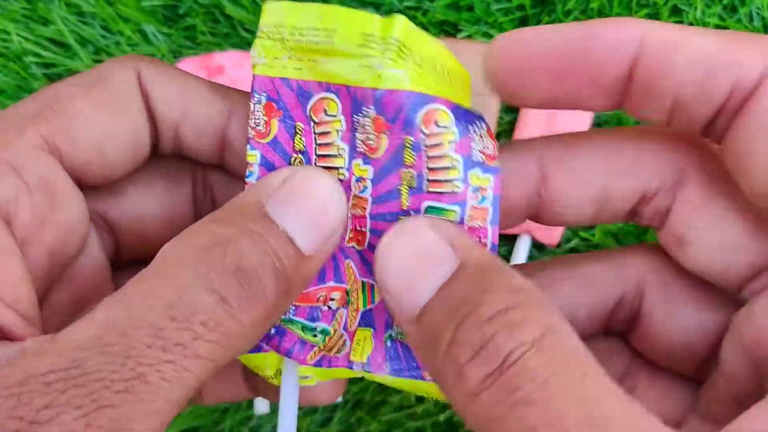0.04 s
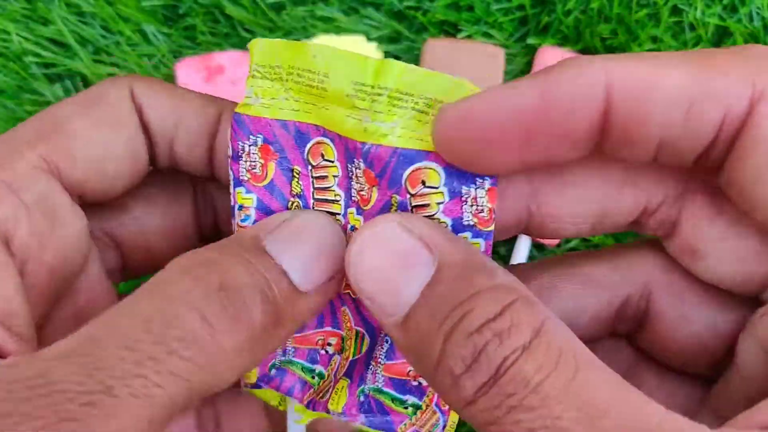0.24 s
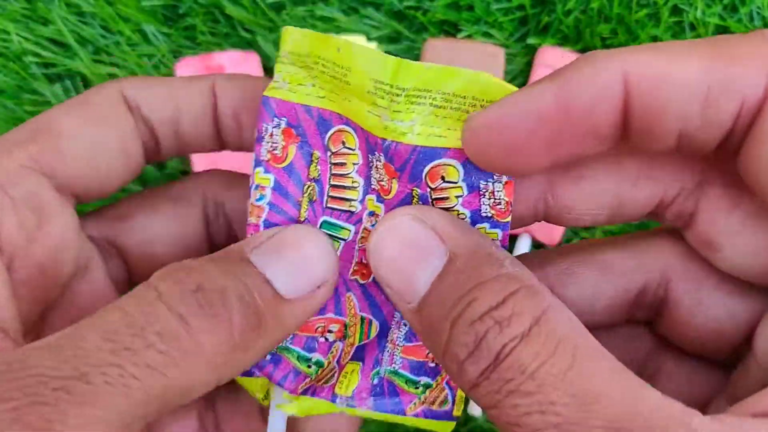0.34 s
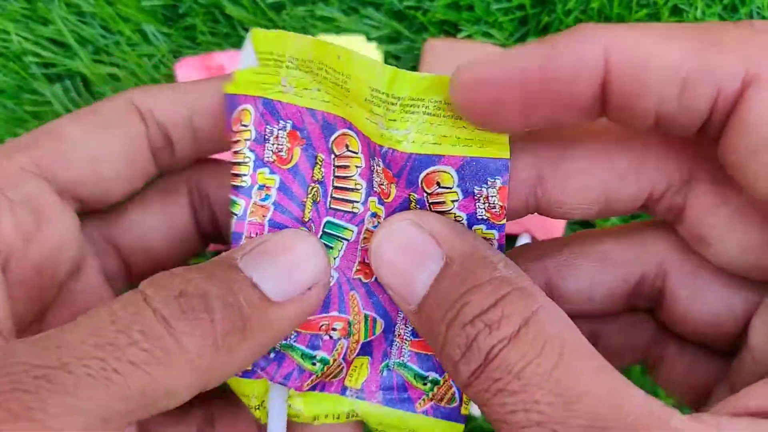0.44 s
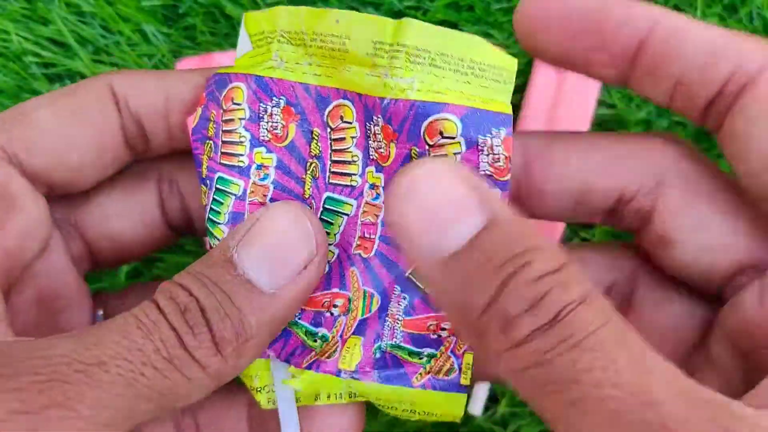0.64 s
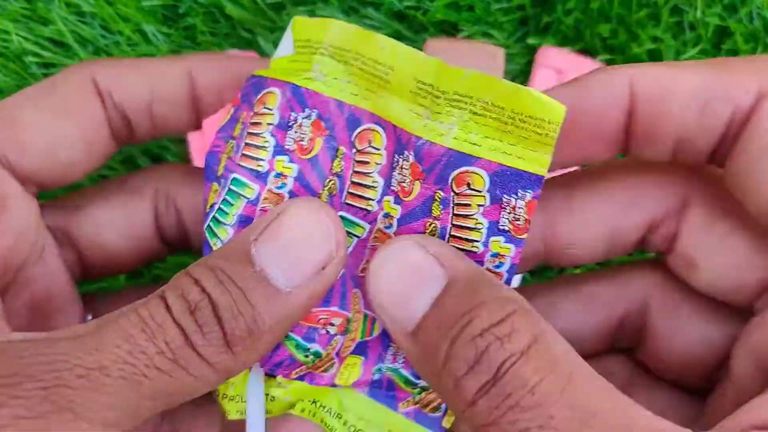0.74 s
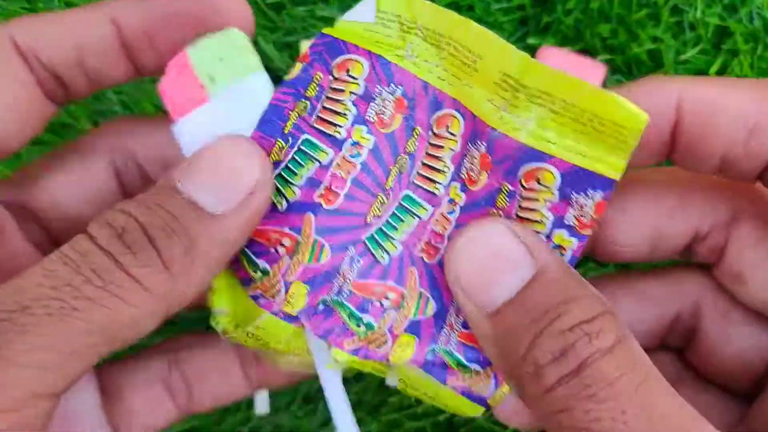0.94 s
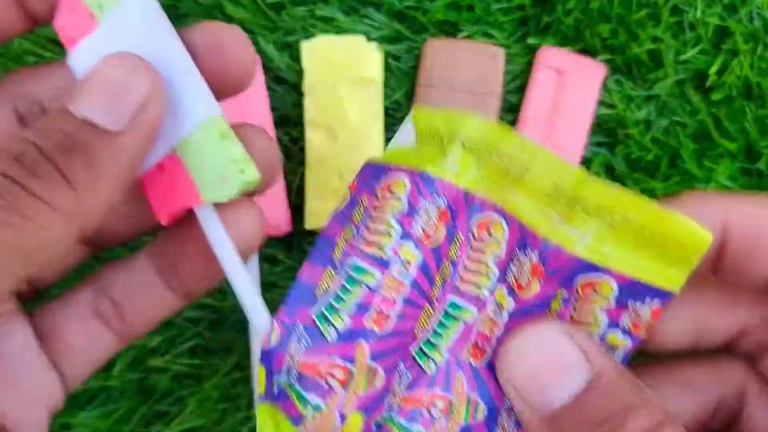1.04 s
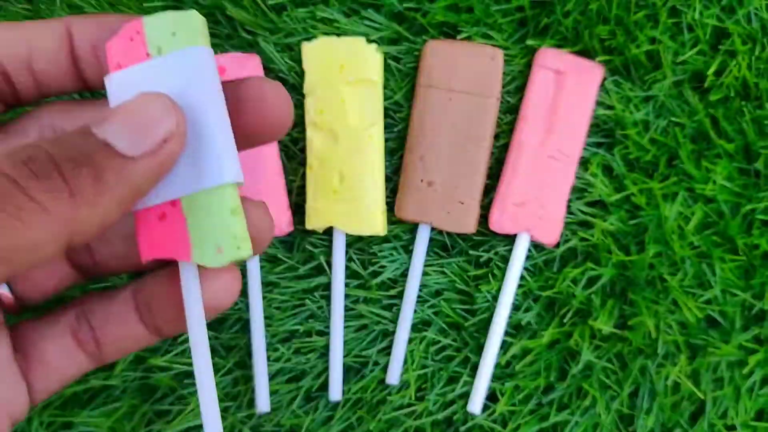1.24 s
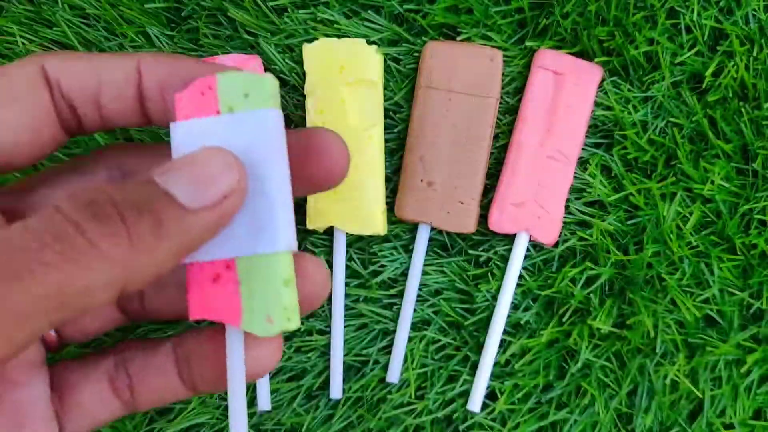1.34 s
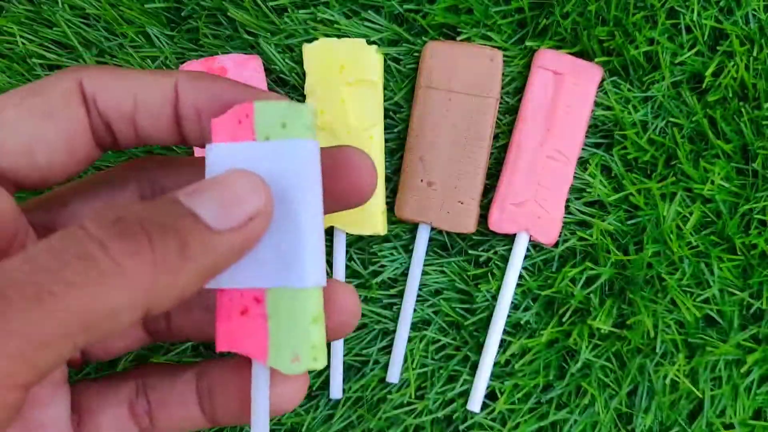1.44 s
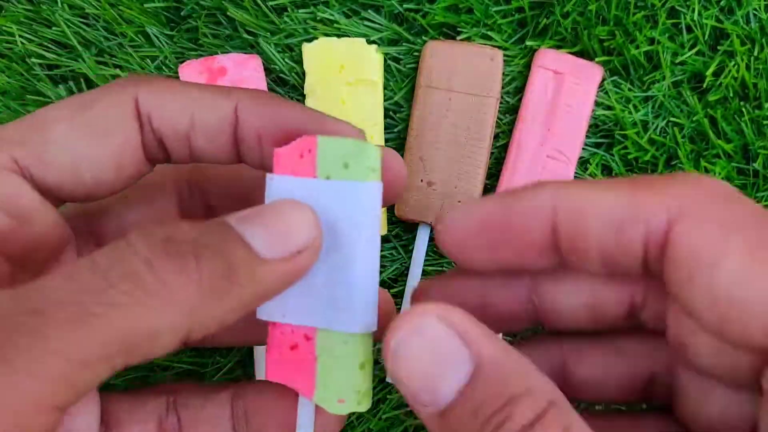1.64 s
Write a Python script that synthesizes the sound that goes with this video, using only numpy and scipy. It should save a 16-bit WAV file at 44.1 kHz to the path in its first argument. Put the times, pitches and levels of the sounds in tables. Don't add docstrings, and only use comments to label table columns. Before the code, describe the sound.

Thin plastic candy wrapper crinkling and snapping in fingers, very close, with near-silent gaps between bursts

```python
import sys
import numpy as np
from scipy import signal
from scipy.io import wavfile
from scipy.ndimage import uniform_filter1d

SR = 44100
rng = np.random.default_rng(int(sys.argv[2]) if len(sys.argv) > 2 else 0)


def to_linear_factor(level_db):
    exponent = np.asarray(level_db, float) / 20
    return 10 ** exponent


def inscribe(sig):
    pcm = np.round(np.clip(np.atleast_2d(sig).T, -1, 1) * 32767)
    wavfile.write(sys.argv[1], SR, pcm.astype(np.int16))


N = 74970


def evened(x):
    return x / np.sqrt(np.mean(x ** 2) + 1e-20)


def peaked(x):
    return x / (abs(x).max() + 1e-20)


def read(points, hz):
    f, value = np.transpose(points)
    return np.interp(np.log(hz + 1), np.log(f + 1), value)


def add(mix, start_s, sound):
    part = mix[max(round(start_s * SR), 0):][:len(sound)]
    part += sound[:len(part)]


def causal(points):
    log_gain = read(points, abs(np.fft.fftfreq(2048, 1 / SR))) * np.log(10) / 20
    return np.fft.ifft(np.exp(np.conj(signal.hilbert(log_gain)))).real[:1024]


def patchy(x, patch_db):
    z = signal.stft(x, nperseg=512, noverlap=384)[2]
    patches = uniform_filter1d(rng.standard_normal(z.shape), size=2, axis=0)
    patches = evened(uniform_filter1d(patches, size=12, axis=1))
    return evened(signal.istft(z * to_linear_factor(patch_db * patches), nperseg=512, noverlap=384)[1][:N])


# start_s, peak_db, length_ms, ring_hz
SNAPS = [(0, -20, 1.2, 4360), (0.0048, -19, 1.6, 4470), (0.0598, -26, 1.3, 3920),
         (0.24, -27.5, 0.704, 4200), (0.2466, -6, 0.55, 4140), (0.2503, 1, 1.3, 4060),
         (0.3909, 3.5, 2.3, 4550), (0.4898, -17, 0.36, 3900), (0.5056, 0.5, 0.69, 4220),
         (0.5361, -16, 1.2, 4370), (0.5838, -13.5, 0.4, 3650), (0.6673, -7.5, 0.93, 4640),
         (0.6854, -16, 1.8, 4170), (0.7336, -6, 2.2, 3900), (0.8118, -13, 3.8, 4160),
         (0.8159, -12.5, 3.3, 4130), (0.821, -4, 1.1, 4200), (0.826, 1, 1.4, 4190),
         (0.8351, -28, 1.2, 4250), (0.8523, -17.5, 0.43, 4100), (0.8576, -23, 3.8, 4200),
         (0.8642, -12, 2.4, 3900), (0.9611, -4.5, 2, 4360), (0.9942, -11.5, 1.4, 4470),
         (1.0259, -5.5, 1.6, 4300), (1.045, -5, 1.1, 4050), (1.0715, 1.5, 0.78, 4340),
         (1.1794, -10, 2.9, 4350), (1.3502, -1.5, 0.8, 3870), (1.4239, -12.5, 1.16, 4460)]
# start_s, peak_db
TICKS = [(0.0273, -51), (0.0983, -46), (0.387, -27), (0.52, -33), (0.5385, -22), (0.5586, -30),
         (0.717, -37), (0.838, -31), (0.9536, -27), (1.0284, -22.5), (1.0397, -22), (1.0527, -25),
         (1.062, -18.5), (1.0941, -31.5), (1.1168, -29), (1.1328, -28.5), (1.4161, -27.5), (1.4209, -19),
         (0.2908, -44), (0.3098, -46.5), (0.3159, -43.5), (0.4565, -29), (0.5475, -27.5), (1.0535, -23.5),
         (1.059, -21), (1.1105, -31), (0.767, -50.5)]
# freq_hz, level_db
BRIGHT = [(700, -50), (2000, -27), (3200, -8), (3750, 2.5), (4400, 4.5), (5150, -6), (5800, -16.5),
          (7050, -10.5), (8000, -19), (8900, -23)]
BRIGHT_HZ = 4200
TICK_MS = 3.9
SNAP_TAIL_DB, SNAP_TAIL_MS, SNAP_EDGE_DB = -8.5, 2.6, 22
SWELL_SHARE = 0.42
LEAD_SAMPLES = 40


def snap(peak_db, length_ms, ring_hz, noise):
    t = np.arange(len(noise)) / SR
    length_ms = max(length_ms, 0.2)
    crack = t / (length_ms / 9e3 + t) * np.exp(-2e3 * t / length_ms)
    rattle = to_linear_factor(SNAP_TAIL_DB) * np.exp(-1e3 * t / SNAP_TAIL_MS)
    edge = to_linear_factor(SNAP_EDGE_DB) / length_ms * signal.unit_impulse(len(t), 8)
    drive = noise * (crack + rattle) + edge
    tense = [(hz * ring_hz / BRIGHT_HZ if hz < 5500 else hz, level_db) for hz, level_db in BRIGHT]
    after = causal([(hz, (1 - SWELL_SHARE) * level_db) for hz, level_db in tense])
    before = causal([(hz, SWELL_SHARE * level_db) for hz, level_db in tense])
    film = np.convolve(after, before[LEAD_SAMPLES::-1])
    return to_linear_factor(peak_db) * peaked(signal.fftconvolve(drive, film)[:len(t)])


# start_s, peak_db, pitch_hz
POPS = [(0.0054, -30, 1650), (0.0588, -35, 1690), (0.2424, -30.5, 512), (0.2463, -12.5, 1470),
        (0.2509, -8.5, 1940), (0.3909, -15.5, 1966), (0.4892, -21, 783), (0.505, -17, 863),
        (0.5529, -25, 642), (0.5842, -30.5, 940), (0.6636, -20, 1030), (0.6668, -22, 1416),
        (0.6851, -20.5, 1230), (0.7318, -16.5, 450), (0.8034, -24, 600), (0.8085, -11, 436),
        (0.8112, -13.5, 635), (0.8205, -7.5, 1426), (0.8253, -14.5, 1995), (0.8345, -31.5, 2150),
        (0.8636, -19.5, 1450), (0.9604, -11, 1910), (0.9939, -12, 790), (1.0243, -13, 1220),
        (1.0311, -9, 937), (1.0372, -6, 958), (1.047, -10, 900), (1.0553, -9.5, 827), (1.11, -20, 650),
        (1.1299, -17, 620)]
# start_s, peak_db, pitch_hz
LATE_POPS = [(0.0164, -31.5, 456), (0.8166, -17.5, 1535), (0.8518, -25, 670), (0.8571, -23, 1180),
             (1.0001, -18.5, 628), (1.01, -34, 754), (1.0462, -23, 770), (1.0626, -21, 557),
             (1.0709, -19.5, 413), (1.0946, -28, 396.6), (1.1178, -24, 595), (1.1784, -19.5, 1950),
             (1.3514, -25.5, 1660), (0.6878, -20.5, 1186), (1.0505, -15, 900), (1.177, -23.5, 523),
             (1.196, -37, 613), (1.351, -41, 780), (1.135, -27.5, 1900), (0.729, -33, 660)]
# freq_hz, level_db
DULL = [(100, -31.5), (380, -23), (600, 2.5), (1100, 0), (2100, -6), (2500, -11), (3500, -24)]
POP_EDGE_DB, POP_SECOND_DB, POP_SECOND_RATIO = -5, -11, 1.4
POP_T60_S, POP_T60_CYCLES = 0.011, 6.74
POP_CUT_RATIO = 0.7


def pop(peak_db, pitch_hz, noise):
    t = np.arange(len(noise)) / SR
    t60_s = POP_T60_S + POP_T60_CYCLES / pitch_hz
    envelope = to_linear_factor(-60 * t / t60_s) * np.minimum(t * pitch_hz * 1.3, 1) ** 2
    first = np.sin(2 * np.pi * pitch_hz * t)
    second = np.sin(2 * np.pi * pitch_hz * POP_SECOND_RATIO * t + 3 * noise[0])
    edge = evened(signal.fftconvolve(noise, causal(DULL))[:len(t)])
    panel = envelope * (first + to_linear_factor(POP_SECOND_DB) * second + to_linear_factor(POP_EDGE_DB) * edge)
    low_cut = signal.butter(4, pitch_hz * POP_CUT_RATIO, "high", fs=SR, output="sos")
    return to_linear_factor(peak_db) * peaked(signal.sosfilt(low_cut, panel))


# start_s, end_s, first_db, last_db, dull_share_db
PULLS = [(0, 0.079, -35, -61, -3), (0.06, 0.115, -52, -65, -8.5), (0.253, 0.262, -49, -56, 10),
         (0.258, 0.282, -52, -58, 9), (0.287, 0.331, -46, -46.5, -3), (0.334, 0.37, -50, -64, -13),
         (0.376, 0.388, -50.5, -43.5, -0.5), (0.387, 0.496, -45.5, -41, -4.5),
         (0.516, 0.543, -40.5, -32, -7), (0.543, 0.58, -35, -37, -4.5), (0.583, 0.594, -30, -42.5, -1.5),
         (0.597, 0.61, -50, -46.5, -9), (0.613, .648, -54.5, -67, -9), (0.667, 0.736, -42, -44, -4),
         (0.795, 0.81, -59, -51, 6), (0.815, 0.869, -38, -45, 3.5), (0.882, 0.927, -39.5, -42.5, -9.5),
         (0.949, 1.013, -49, -40.5, 5.5), (1.025, 1.048, -34, -36, 4.5), (1.058, 1.064, -27, -30, -1.5),
         (1.079, 1.083, -33.5, -37, -5.5), (1.088, 1.1, -33.5, -36, -6.5), (1.096, 1.137, -35.5, -39.5, -7),
         (1.148, 1.19, -44, -42.5, -10.5), (1.216, 1.313, -72.5, -76, 0), (1.348, 1.386, -40, -43, -11),
         (1.421, 1.446, -36.5, -55, -12.5)]
GRAINS_PER_S, GRAIN_SPREAD_DB, GRAIN_MS = 3600, 3.0, 1.0
DULL_PATCH_DB, BRIGHT_PATCH_DB, FLICKER_DB = 5, 1.5, 1.5
RISE_DB_PER_S, SETTLE_DB_PER_S, DULL_SETTLE_DB_PER_S = 900.5, 1402, 502


def pull_level_db(settle_db_per_s, dull):
    t = np.arange(N) / SR
    levels = []
    for start_s, end_s, first_db, last_db, dull_share_db in PULLS:
        level_db = np.interp(t, [start_s, end_s], [first_db, last_db]) + dull * dull_share_db
        level_db -= RISE_DB_PER_S * np.maximum(start_s - t, 0)
        levels.append(level_db - settle_db_per_s * np.maximum(t - end_s, 0))
    return np.max(levels, axis=0)


def rustle():
    grain = np.exp(-np.arange(400) / SR * 1e3 / GRAIN_MS)
    out = np.zeros(N)
    for colour, settle_db_per_s, patch_db, dull in (
            (BRIGHT, SETTLE_DB_PER_S, BRIGHT_PATCH_DB, False),
            (DULL, DULL_SETTLE_DB_PER_S, DULL_PATCH_DB, True)):
        size = to_linear_factor(GRAIN_SPREAD_DB * np.minimum(rng.exponential(1, N), 4))
        size = size * (rng.random(N) < GRAINS_PER_S / SR)
        clumps = to_linear_factor(FLICKER_DB * evened(uniform_filter1d(rng.standard_normal(N), size=300)))
        envelope = np.sqrt(abs(signal.oaconvolve(size ** 2, grain)[:N]))
        drive = envelope * clumps * rng.standard_normal(N)
        film = patchy(signal.oaconvolve(drive, causal(colour))[:N], patch_db)
        out += to_linear_factor(pull_level_db(settle_db_per_s, dull)) * film
    return out


GATE_DB, GATE_DEPTH_DB = -73, -12


def suppress(x):
    z = signal.stft(x, nperseg=1024, noverlap=768)[2]
    power = uniform_filter1d(abs(z) ** 2, size=3, axis=1)
    keep = np.maximum(power ** 2 / (power ** 2 + to_linear_factor(5.3 * GATE_DB)), to_linear_factor(GATE_DEPTH_DB))
    return signal.istft(z * keep, nperseg=1024, noverlap=768)[1][:N]


# start_s, length_s, level_db, pitch_hz
STREAKS = [(0.047, 0.13, -62, 3700), (0.065, 0.13, -60.5, 3800), (0.075, 0.031, -61, 1770),
           (1.19, 0.027, -60, 2180), (1.19, 0.027, -58, 3000), (1.8, 0.02, -59, 2700),
           (1.355, 0.034, -47.5, 960), (1.24, 0.03, -71.5, 1760), (0.685, 0.02, -44, 2100),
           (0.01485, 0.0405, -46.5, 290), (0.256, 0.053, -54, 830), (0.38, .035, -49, 500),
           (0.609, 0.022, -62, 508), (0.616, 0.028, -55.5, 1500), (0.761, 0.014, -67, 2900),
           (1.192, 0.022, -51, 1366), (1.205, 0.028, -57.5, 1065), (1.341, 0.062, -52, 700),
           (1.398, 0.05, -52.5, 585), (1.485, 0.0205, -69, 4740), (1.613, 0.05, -66.5, 3870),
           (1.613, 0.028, -60.5, 4540), (1.6, 0.021, -72.5, 4700), (1.627, 0.017, -76.5, 570)]
STREAK_WIDTH_RATIO = 0.025


def streak(length_s, level_db, pitch_hz, noise):
    t = np.arange(round(length_s * SR)) / SR
    pole = np.exp(-np.pi * STREAK_WIDTH_RATIO * pitch_hz / SR)
    waver = signal.lfilter([1], [1, -pole], noise[:len(t)] + 1j * noise[-len(t):])
    waver = uniform_filter1d(waver.real, size=120) + 1j * uniform_filter1d(waver.imag, size=120)
    tone = np.exp(2j * np.pi * pitch_hz * t) * (0.5 + 0.5 * waver / abs(waver).mean())
    return to_linear_factor(level_db) * evened(tone.real) * signal.windows.tukey(len(t), 0.5)


# start_s, peak_db, pitch_hz
PUSHES = [(0.25, -26.5, 221), (0.271, -40, 124), (0.799, -27, 216), (0.814, -28.5, 123.6),
          (.963, -31.5, 195.4), (1.073, -15.5, 305), (1.129, -26, 224.5), (1.196, -17.5, 149),
          (1.209, -27.5, 85), (1.231, -34, 106), (1.255, -42.5, 150), (1.28, -58, 103.6)]
PUSH_CYCLES = 0.66


def push(peak_db, pitch_hz):
    cycles = np.arange(-2, 2, pitch_hz / SR)
    wiggle = np.sin(2 * np.pi * cycles + 3.0) * np.exp(-(cycles / PUSH_CYCLES) ** 2)
    return -to_linear_factor(peak_db) * peaked(wiggle)


# start_s, peak_db
KICKS = [
    (0.2499, -25),
    (0.389, -35.5),
    (0.507, -33.5),
    (0.5842, -44.5),
    (0.6675, -33),
    (0.9624, -19),
    (0.9947, -38),
    (1.3508, -33),
    (1.424, -44),
]
KICK_MS = 0.37


def kick(peak_db):
    t_ms = np.arange(-60, 60) / SR * 1e3
    return to_linear_factor(peak_db) * np.exp(-(t_ms / KICK_MS) ** 2)


# start_s, end_s, first_db, last_db
HANDLING = [
    (0, 0.057, -46.5, -67),
    (0.791, 0.897, -34, -47),
    (1.04, 1.146, -33.5, -40),
    (1.145, 1.157, -53, -54),
    (1.172, 1.213, -40.5, -43),
    (1.209, 1.292, -48.5, -64.5),
]
# freq_hz, level_db
RUB = [(50, -16), (120, 0), (430, -5), (1800, -58)]


def handling():
    t = np.arange(N) / SR
    levels = []
    for start_s, end_s, first_db, last_db in HANDLING:
        outside_s = abs(t - np.clip(t, start_s, end_s))
        level_db = np.interp(t, [start_s, end_s], [first_db, last_db])
        levels.append(level_db - RISE_DB_PER_S * outside_s)
    rumble = patchy(signal.oaconvolve(rng.standard_normal(N), causal(RUB))[:N], 3.5)
    return to_linear_factor(np.max(levels, axis=0)) * rumble


# freq_hz, level_db
FLOOR = [(30, -26), (113, -2), (526, -15), (1200, -17), (10000, -32)]
FLOOR_DB, FLOOR_SAG_DB_PER_S = -78, 4.5
HUM_HZ, HUM_DB = 400, -85


def floor():
    t = np.arange(N) / SR
    air = patchy(signal.oaconvolve(rng.standard_normal(N), causal(FLOOR))[:N], 2.1)
    lines = sum(np.sin(2 * np.pi * k * HUM_HZ * t) for k in (1, 2, 3))
    return to_linear_factor(FLOOR_DB - FLOOR_SAG_DB_PER_S * (t - 2.5)) * air + to_linear_factor(HUM_DB) * lines


def scene():
    mix = suppress(rustle()) + floor() + handling()
    ticks = [(start_s, peak_db, TICK_MS, BRIGHT_HZ) for start_s, peak_db in TICKS]
    snap_lead_s = (LEAD_SAMPLES - 12) / SR
    for table, voice, lead_s in ((SNAPS, snap, snap_lead_s), (ticks, snap, snap_lead_s),
                                 (POPS, pop, 0), (LATE_POPS, pop, 0)):
        for (start_s, *row), noise in zip(table, rng.standard_normal((30, 1200))):
            add(mix, start_s - lead_s, voice(*row, noise))
    for start_s, peak_db in KICKS:
        add(mix, start_s - 60 / SR, kick(peak_db))
    for (start_s, *row), noise in zip(STREAKS, rng.standard_normal((30, 12000))):
        add(mix, start_s, streak(*row, noise))
    for start_s, peak_db, pitch_hz in PUSHES:
        add(mix, start_s - 2 / pitch_hz, push(peak_db, pitch_hz))
    return mix[None]


def band_limit(x):
    return signal.sosfilt(signal.butter(12, 10590, fs=SR, output="sos"), x)


MIC_EDGE_HZ, MIC_LOW_HZ = 9354, 28.0
FADE_OUT_S, FADE_LENGTH_S = 1.655, 0.028
CEILING = 0.88


def record(dry):
    x = signal.sosfilt(signal.cheby1(10, 1, MIC_EDGE_HZ, fs=SR, output="sos"), dry)
    x = signal.sosfilt(signal.butter(2, MIC_LOW_HZ, "high", fs=SR, output="sos"), x)
    fade = np.clip(1 - (np.arange(N) / SR - FADE_OUT_S) / FADE_LENGTH_S, 0.02, 1)
    return band_limit(np.clip(x * fade, -CEILING, CEILING))


dry = scene()
out = record(dry)
inscribe(out)
```